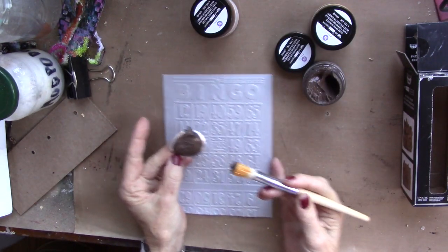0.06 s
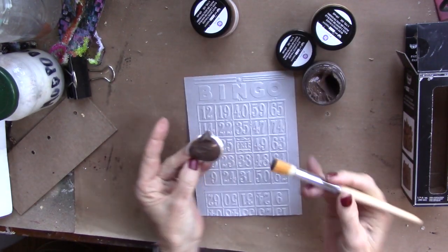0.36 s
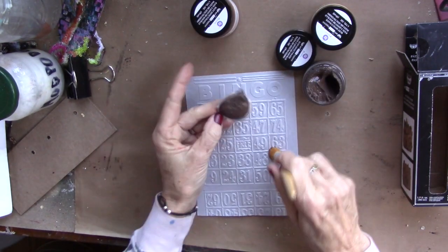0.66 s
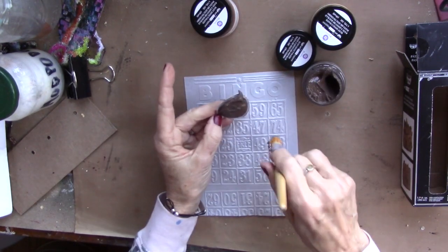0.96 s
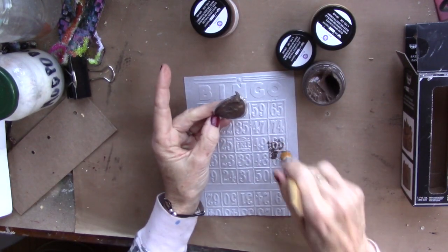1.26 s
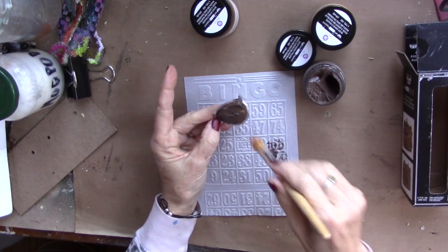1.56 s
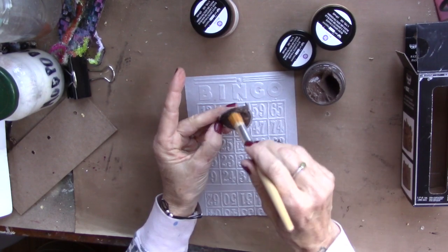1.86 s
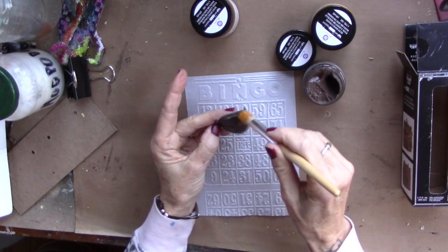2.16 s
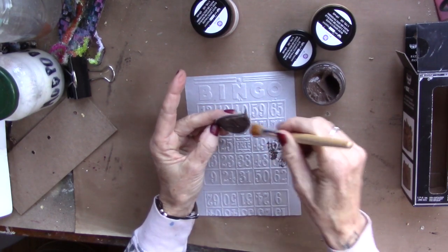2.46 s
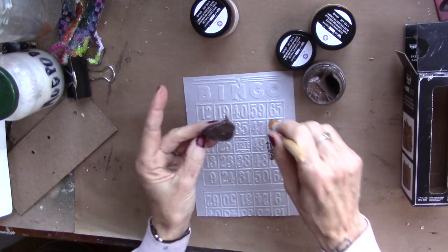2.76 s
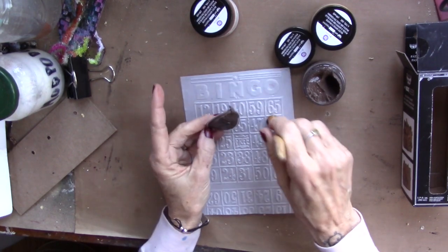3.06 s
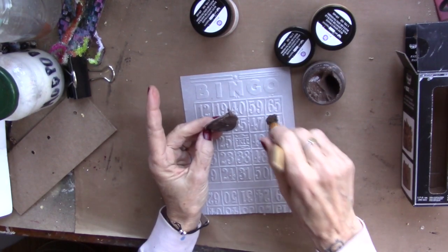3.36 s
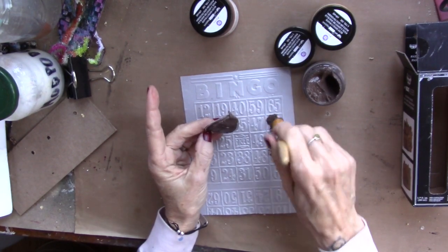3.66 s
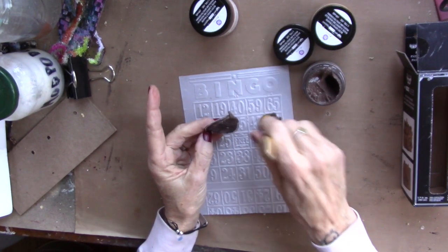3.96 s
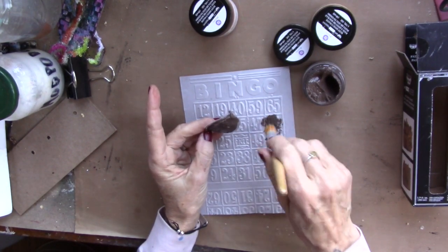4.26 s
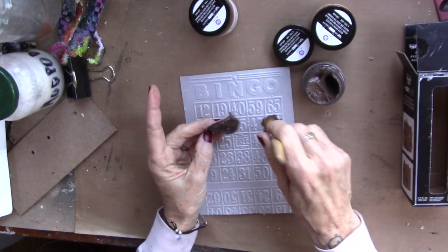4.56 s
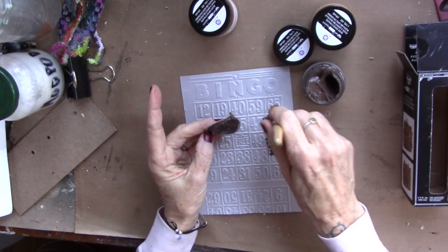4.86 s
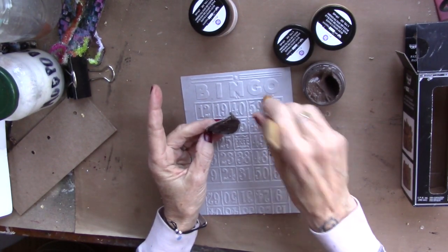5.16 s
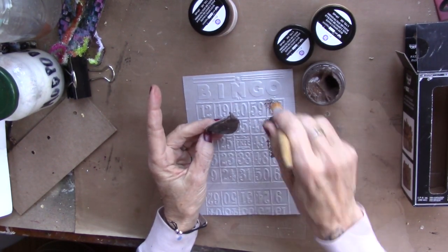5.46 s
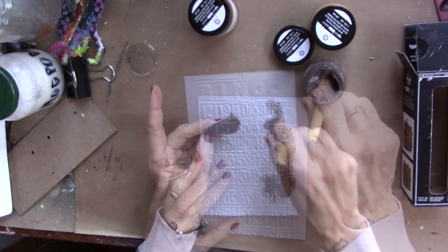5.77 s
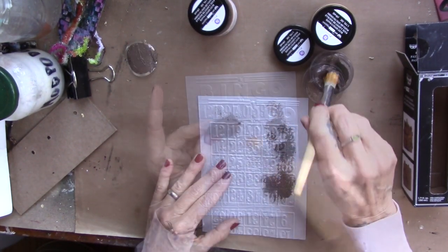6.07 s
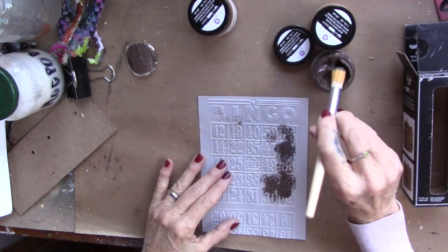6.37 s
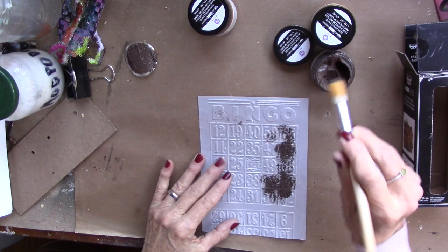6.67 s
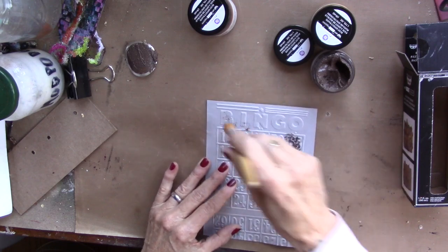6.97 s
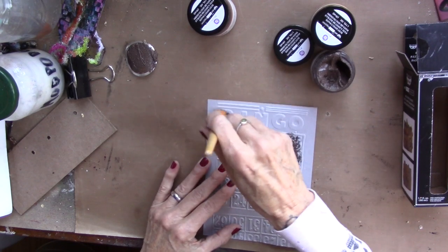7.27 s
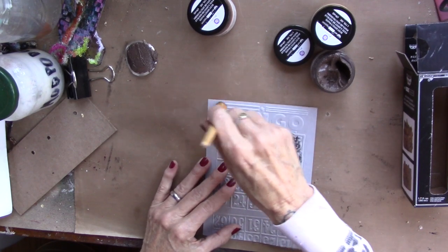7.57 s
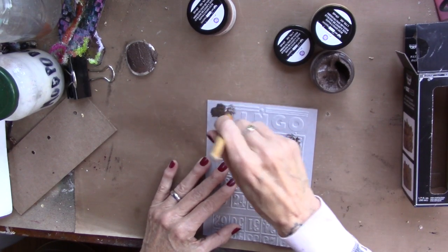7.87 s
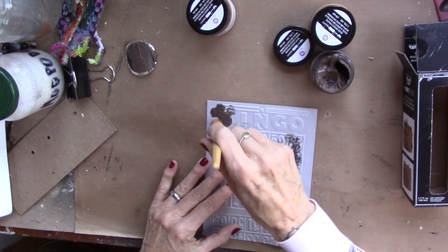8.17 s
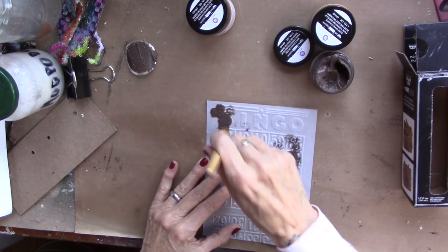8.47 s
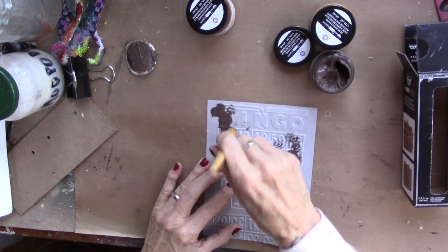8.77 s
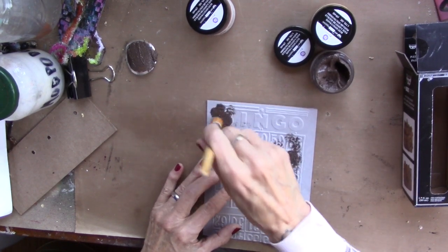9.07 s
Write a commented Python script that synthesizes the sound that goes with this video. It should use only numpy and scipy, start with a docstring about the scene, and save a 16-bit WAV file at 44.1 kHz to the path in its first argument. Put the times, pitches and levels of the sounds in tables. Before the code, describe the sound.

A small stiff brush dabs thick paste onto card lying on a table, about six taps a second. Each tap has a crisp bristle crunch, a dull knock and a faint sticky release. A short run comes first, then a long one, then a slightly softer one, with card and sleeve sliding faintly in the pauses. It sounds close, in a small room with a steady hum.

```python
"""A small stiff brush dabs thick paste onto card lying on a craft table, in three runs of quick taps. In each
dab the bristle tips touch, the brush bottoms out and knocks the table, the bristles crush, an air pocket pops
and the sticky paste lets go. Card, hand and sleeve slide now and then, and the brush rubs on the paste holder.
The room is small, with a steady hum and a faint whine; left and right sound almost the same."""
import sys
import numpy as np
from scipy import signal
from scipy.fft import rfft, irfft
from scipy.io import wavfile

SR = 44100
rng = np.random.default_rng(int(sys.argv[2]) if len(sys.argv) > 2 else 0)


def store_pcm(level_fs):
    """Save levels as 16-bit WAV."""
    pcm = np.round(np.clip(level_fs, -1, 1) * 32767).astype(np.int16)
    wavfile.write(sys.argv[1], SR, np.atleast_2d(pcm).T)


N = 406818
BLOCK = 8192  # samples; short sounds and filters are sized from this

# tone colours, as the relative strength of each pitch (f/Hz, level/dB)
HUM_COLOUR = [(25, -26), (60, -13.5), (110, -3), (160, -2), (230, 1.5), (350, 1.5), (500, -3), (800, -6.5),
              (2000, -12), (5000, -18.5), (11000, -25.5), (16000, -35)]  # room noise
RUB_COLOUR = [(100, -24), (800, -3), (1600, 6.5), (3000, 1), (6000, -2), (10000, -5.5), (13000, -13),
              (16000, -23)]  # sliding card and sleeve
FLICK_COLOUR = [(80, -28), (500, -20), (1500, 2.5), (3000, -1), (4200, -4.5), (6000, -1.5), (10000, -4),
                (13000, -14), (16000, -16)]  # a bristle springing loose
BRISTLE_COLOUR = [(80, -33.5), (400, 2.5), (900, -5.5), (1500, -0.5), (3000, -1.5), (4200, -9.5),
                  (5800, -7), (8000, -11.5), (11500, -17), (15500, -28.5)]  # many bristles together
SLAP_COLOUR = [(80, -28), (400, 3), (900, -2), (1500, 0), (3000, 0.5), (4200, -7), (5800, -2.5),
               (8000, -15), (11500, -20.5), (15500, -35)]  # card hitting the table
THUD_COLOUR = [(30, -36.5), (60, -29), (110, -2.5), (200, 2.5), (320, 10.5), (520, -2.5), (800, -0.5),
               (1200, -34.5), (2000, -37), (4000, -34), (10000, -52)]  # the push into the table
CHATTER_COLOUR = [(60, -38), (150, -4), (320, 2.5), (550, -4.5), (820, 2.5), (1150, -13), (2000, -11.5),
                  (5000, -22), (12000, -45)]  # buzzing card
PASTE_COLOUR = [(100, -33), (600, 5), (1600, 7.5), (3500, 2.5), (6000, 2), (10000, -3), (13000, -7),
                (16000, -14)]  # tearing paste
# left-right difference of the room noise, compared with what both sides share (f/Hz, level/dB)
HUM_WIDTH = [(30, -9), (70, -13), (200, -13), (700, -10), (2400, -10), (4400, -18), (8000, -35),
             (15000, -35)]
# change in the room noise, which dips briefly (t/s, level/dB)
HUM_DRIFT = [(0, -3.2), (5.8, -3.5), (6.019, -6), (6.4, -2.5), (9.2, -2)]
# loudness of the electrical whine (t/s, level/dB)
WHINE_LEVELS = [(0, -78), (2.1, -81), (3.3, -72), (6, -80), (7.3, -76), (9.2, -79)]
# slides of card, hand and sleeve, and near 2.4-2.7 s the brush rubbing on the paste holder (loudest t/s,
# rise/s, fall/s, level/dB, treble/dB)
SLIDES = [(.22, 0.46, 0.17, -50, 0.5), (2.419, 0.16, .08, -61, 18), (2.67, .12, .08, -59, 2),
          (2.9, 0.067, 0.12, -55.5, -7), (3.085, 0.017, 0.019, -48.5, 0), (3.891, 0.044, 0.076, -52.5, 3),
          (6.665, 0.029, 0.048, -59, 10), (6.83, 0.096, 0.12, -51, 0)]
# single flicks of bristle and card (t/s, level/dB, treble/dB)
FLICKS = [(0.2313, -33, 17), (.2513, -34, 6), (2.8704, -38, -52), (2.8778, -44, -49), (2.887, -40.5, 11),
          (2.9314, -42, -23), (2.9732, -42, -8), (3.0722, -47.5, 0), (3.924, -46, -2), (4.3518, -31.5, 3),
          (7.967, -55, 15)]
# brush dabs (knock t/s, time for the tips to flatten/s, time held down/s, thud level/dB, slap level/dB)
DABS = [(0.6411, 0.0079, 0.071, -41, -30), (0.8343, 0.0067, 0.062, -35, -24.5),
        (1.0216, 0.0029, 0.055, -34.5, -23.5), (1.201, 0.0034, 0.054, -33.5, -28),
        (1.366, 0.0042, .051, -33.5, -30), (2.8309, 0.012, 0.082, -46.5, -41.5),
        (3.151, .010, 0.089, -39.5, -78), (3.3255, 0.007, .064, -40.5, -36),
        (3.4865, 0.0067, 0.057, -41.5, -35.5), (3.6538, 0.0087, 0.057, -37.5, -29),
        (3.821, 0.013, 0.076, -37, -25), (3.9705, 0.013, 0.068, -39.5, -35),
        (4.1477, 0.0099, 0.049, -41.5, -31), (4.3191, .0075, 0.076, -36, -26),
        (4.5068, 0.0088, .073, -38, -30), (4.6764, 0.011, 0.078, -37.5, -28),
        (4.8444, 0.012, 0.068, -42.5, -35), (5.0193, .014, .058, -42.5, -35.5),
        (5.19, .012, 0.064, -41.5, -35.5), (5.376, 0.0088, 0.062, -37.5, -27.5),
        (5.5474, 0.0038, 0.06, -35, -36.5), (5.7238, 0.0058, 0.058, -34, -28.5),
        (7.0785, .016, 0.091, -47.5, -36), (7.239, .015, .074, -43, -37), (7.4017, 0.017, 0.079, -39, -32),
        (7.559, 0.021, .067, -42, -38), (7.725, 0.016, 0.058, -45.5, -38.5),
        (7.8966, .015, 0.074, -43, -33.5), (8.0616, .016, 0.071, -43.5, -36.5),
        (8.2358, 0.011, 0.063, -54, -50), (8.4139, 0.0076, 0.054, -46, -37),
        (8.5956, 0.0058, 0.065, -38, -33.5), (8.771, 0.0069, 0.044, -39, -33.5),
        (8.943, 0.0071, 0.051, -40.5, -32), (9.1119, 0.0082, 0.065, -42, -35)]
# each run has its own load of paste and spot on the card; in the last a hand holds the card down
# (start t/s, crush level/dB, lift level/dB, pop level/dB, card's ring f/Hz, chatter over thud/dB)
RUNS = [(.5, -44, -46, -49, 1370, -1.5), (2.7, -45.5, -53, -64, 1350, -4), (6.9, -42, -48, -41, 1624, -5)]
# the tones at which the table top rings (f/Hz, relative level/dB, time to fade by 60 dB/s)
TABLE_TONES = [(57, -18, .3), (75, -18, .3), (110, -8, .27), (167, -15, .24), (196, -7, .23),
               (221, -3, .24), (275, -1, .23), (303, -2, .22), (322, 1, .24), (363, -4, .22),
               (428, -4, .22), (479, -6, .21), (560, -9, .2), (592, -6, .21), (703, -7, .2), (790, -4, .19),
               (824, -1, .2), (899, -7, .19), (969, -11, .18), (1066, -12, .18), (1244, -9, .18)]
# wait from the knock to the pop of air (earliest t/s, latest t/s)
POP_DELAY = (0.0058, 0.015)
# soft bumps of brush and hand that shake the card (t/s, level/dB)
BUMPS = [(1.775, -54.5), (2.875, -46), (2.985, -45.5)]
# how long the room's echo lasts (f/Hz, time to fade by 60 dB/s)
ROOM_DECAY = [(100, 0.91), (260, 0.32), (700, 0.42), (1840, 0.44), (4850, 0.32), (12000, 0.085)]

SNAP_S, THUD_S = .0035, .03  # the level of a snap or a thud is its average over this time


def gain_of(db):
    """Turns decibels into a number to multiply by."""
    return 10 ** (np.asarray(db) / 20)


def unit(x):
    """Scales a sound to an energy of one."""
    return x / np.sqrt(np.sum(x ** 2) + 1e-20)


def value_at(points, hz):
    """Looks up pitches in a table, joining its points by straight lines over log frequency."""
    f, value = np.transpose(points)
    return np.interp(np.log(hz + 1), np.log(f), value)


def add(mix, s, sound):
    """Mixes a sound in at s seconds."""
    start = round(s * SR)
    sound = sound[max(-start, 0):]
    part = mix[max(start, 0):][:len(sound)]
    part += sound[:len(part)]


def click(colour, treble_db=0, card_hz=1500, card_db=0, card_width_hz=240):
    """One click of a given colour, with more or less treble and a peak where the card rings."""
    hz = np.fft.rfftfreq(BLOCK, 1 / SR)
    db = value_at(colour, hz) + treble_db * hz ** 2 / (hz ** 2 + 4000 ** 2)
    db += card_db / (1 + ((hz - card_hz) / card_width_hz) ** 2)
    # keep the colour but pack the energy at the start of the click
    cepstrum = irfft(np.log(gain_of(db)))
    cepstrum[1:BLOCK // 2] *= 2
    cepstrum[BLOCK // 2 + 1:] = 0
    return unit(irfft(np.exp(rfft(cepstrum)))[:BLOCK // 2])


def crackle(envelope, grain, per_s, spread_db):
    """Many uneven copies of the click `grain` over a faint hiss; the envelope shapes their loudness."""
    count = len(envelope)
    size = gain_of(spread_db * np.minimum(rng.exponential(1, count), 4))
    sign = rng.choice([-1, 1], count)
    hits = rng.random(count) < per_s / SR
    kicks = size * sign * (hits + 0.06)
    return unit(signal.fftconvolve(kicks * envelope, grain)) * np.linalg.norm(envelope)


def hum(base_db=-55.5):
    """Steady room noise and microphone hiss, almost the same left and right."""
    hz = np.fft.rfftfreq(N, 1 / SR)
    middle, side = rfft(rng.standard_normal((2, N))) * gain_of(value_at(HUM_COLOUR, hz))
    side *= gain_of(value_at(HUM_WIDTH, hz))
    pair = np.sqrt(2 * N) * unit(irfft(np.array([middle + side, middle - side]), N))
    drift_db = np.interp(np.arange(N) / SR, *np.transpose(HUM_DRIFT))
    return gain_of(base_db + drift_db) * pair


def whine(centre_hz=5530, width_hz=45):
    """A faint, wavering electrical tone: a narrow band of the microphone's own noise."""
    hz = np.fft.rfftfreq(N, 1 / SR)
    tone = irfft(rfft(rng.standard_normal(N)) / (1 + ((hz - centre_hz) / width_hz) ** 2), N)
    db = np.interp(np.arange(N) / SR, *np.transpose(WHINE_LEVELS))
    return gain_of(db) * np.sqrt(N) * unit(tone)


def slides():
    """Card, hand, sleeve and the brush on the paste holder rub with a fine grain that swells and dies away."""
    out = np.zeros(N)
    for s, rise, fall, db, treble_db in SLIDES:
        envelope = np.interp(np.arange(-rise, fall, 1 / SR), [-rise, 0, fall], [0, 1, 0])
        rub = crackle(envelope, click(RUB_COLOUR, treble_db), per_s=12000, spread_db=4.5)
        add(out, s - rise, gain_of(db) * rub)
    return out


def snap(db, grain, fade_s):
    """A tiny, sharp hit: a very short, dense burst of clicks."""
    t = np.arange(BLOCK // 32) / SR
    envelope = unit(t * np.exp(-t / (fade_s / 2)))
    return gain_of(db) * np.sqrt(SNAP_S * SR) * crackle(envelope, grain, per_s=9000, spread_db=2.9)


def flicks():
    """Single bristles or the card's edge spring loose."""
    out = np.zeros(N)
    for s, db, treble_db in FLICKS:
        add(out, s + 0.000975, snap(db, click(FLICK_COLOUR, treble_db), fade_s=0.00082))
    return out


def touch(s, db, flatten_s, grain, softness=0.13, graze_db=-17):
    """The longest bristles graze, then the tips land and skid until s. Gives start time and sound."""
    t = np.arange(-int(2 * flatten_s * SR), 0) / SR
    landing = .5 + .5 * np.tanh((t / flatten_s + 1) / softness)
    graze = gain_of(graze_db) * np.hanning(len(t))
    return s + t[0], gain_of(db) * crackle(landing + graze, grain, per_s=6000, spread_db=0.9)


def thud(db, ring_db=-2, push_db=-4, travel_s=0.004966, edge_db=-5):
    """A dull push spreads through the table top and leaves it ringing."""
    t = np.arange(2 * BLOCK) / SR
    hz, tone_db, decay_s = np.transpose(TABLE_TONES)[:, :, None]
    spot_db, phase = rng.standard_normal((2, len(TABLE_TONES), 1))  # each spot rings a bit differently
    tones = gain_of(tone_db + spot_db - 60 * t / decay_s) * np.sin(2 * np.pi * (hz * t + phase))
    sound = gain_of(ring_db) * unit(tones.sum(0) * (1 - np.exp(-t / 0.0013)))
    # high pitches cross a bending board faster; this delays 300 Hz by travel_s
    push_hz = np.fft.rfftfreq(BLOCK // 2, 1 / SR)
    delay = np.exp(-4j * np.pi * travel_s * np.sqrt(300 * push_hz))
    push = gain_of(push_db) * irfft(rfft(click(THUD_COLOUR)) * delay)
    add(sound, -travel_s / 4, push)
    add(sound, rng.uniform(0.0029, 0.01076), gain_of(edge_db) * push)  # bounces off the table's edge
    return gain_of(db) * np.sqrt(THUD_S * SR) * sound


def chatter(db, rise_s=0.0011, fade_s=0.024):
    """The card buzzes against the shaking table and settles."""
    t = np.arange(BLOCK) / SR
    envelope = unit((1 - np.exp(-t / rise_s)) * np.exp(-t / fade_s))
    buzz = crackle(envelope, click(CHATTER_COLOUR), per_s=4000, spread_db=3.2)
    return gain_of(db) * np.sqrt(THUD_S * SR) * buzz


def crush(db, grain, fade_s=0.0084, creep_db=-21):
    """Bristles buckle in the paste, then creep quietly."""
    t = np.arange(BLOCK // 2) / SR
    buckle = np.e * t / fade_s * np.exp(-t / fade_s)
    creep = gain_of(creep_db) * np.hanning(len(t))
    return gain_of(db) * crackle(buckle + creep, grain, per_s=1400, spread_db=4.7)


def pop(db, hz, ring_s=.002, ring_db=-1):
    """A pocket of air bursts in the squeezed paste: a dull tick and a short, wet ring."""
    t = np.arange(BLOCK // 8) / SR
    ring = unit(np.sin(2 * np.pi * hz * t) * np.exp(-t / ring_s))
    sound = snap(db, click(FLICK_COLOUR, treble_db=-30), fade_s=0.00068)
    add(sound, 0, gain_of(db + ring_db) * np.sqrt(SNAP_S * SR) * ring)
    return sound


def lift(s, db, rise_s=0.018, fall_s=0.0077):
    """Threads of paste tear ever louder until the brush comes free at s. Gives start time and sound."""
    t = np.arange(-BLOCK // 4, BLOCK // 8) / SR
    envelope = np.exp(np.minimum(t / rise_s, -t / fall_s))
    tearing = crackle(envelope, click(PASTE_COLOUR, treble_db=.4), per_s=2500, spread_db=2.3)
    return s + t[0], gain_of(db) * tearing


def dabs(usual_thud_db=-40.5, usual_touch_db=-40.5, usual_flatten_s=.01):
    """The brush lands, knocks the table and pulls away. Gives the crisp sounds and the dull ones."""
    crisp, dull = np.zeros((2, N))
    chance = rng.uniform(-1.1, 1, (len(DABS), 4))
    for (s, flatten_s, held_s, thud_db, slap_db), (spot, when, size, pitch) in zip(DABS, chance):
        _, crush_db, lift_db, pop_db, card_hz, chatter_db = [run for run in RUNS if run[0] < s][-1]
        card_hz *= 1 + 0.1 * spot
        force_db = thud_db - usual_thud_db
        speed_db = 20 * np.log10(usual_flatten_s / flatten_s)
        touch_db = usual_touch_db + 0.33 * force_db + .85 * speed_db  # harder or faster is louder
        treble_db = 0.19 * (slap_db - thud_db - 7)  # a slap that stands out over the thud is brighter
        tip_click = click(BRISTLE_COLOUR, treble_db, card_hz, card_db=9.5)
        slap_click = click(SLAP_COLOUR, treble_db, card_hz, card_db=6.4)
        crush_click = click(BRISTLE_COLOUR, treble_db - 2, card_hz, card_db=5)
        add(crisp, s - flatten_s, snap(touch_db - 1, tip_click, fade_s=0.002))  # the tips land
        add(crisp, *touch(s, touch_db, flatten_s, tip_click))
        add(crisp, s, snap(slap_db, slap_click, fade_s=0.0014))  # the card slaps the table
        add(crisp, s + 0.000975, crush(crush_db + 0.32 * force_db, crush_click))
        pop_s = s + np.interp(when, [-1, 1], POP_DELAY)
        add(crisp, pop_s, pop(pop_db + 3 * size, hz=1690 * (1 + 0.11 * pitch)))
        add(crisp, *lift(s + held_s, lift_db))
        add(dull, s, thud(thud_db))
        add(dull, s, chatter(thud_db + chatter_db))
    for s, db in BUMPS:
        add(dull, s, chatter(db, rise_s=0.0013))
    return crisp, dull


def room(early_db, tail_db, early_fade_s=0.0036, early_side_db=-27, tail_side_db=-13):
    """The room's stereo answer to a click: direct sound, close echoes, then a tail that grows duller."""
    t = np.arange(2 * BLOCK) / SR
    echoes = rng.choice([-1., 1.], (4, len(t))) * (rng.random((4, len(t))) < 4000 / SR)
    early = echoes[:2] * np.exp(-t / early_fade_s) * (t > .001)
    hz, when, spectrum = signal.stft(echoes[2:] * (t > .005), SR, nperseg=256)
    fade = gain_of(-60 * when / value_at(ROOM_DECAY, hz)[:, None])
    tail = signal.istft(spectrum * fade, SR, nperseg=256)[1][:, :len(t)]
    middle = (t == 0) + gain_of(early_db) * unit(early[0]) + gain_of(tail_db) * unit(tail[0])
    side = gain_of(early_side_db) * unit(early[1]) + gain_of(tail_db + tail_side_db) * unit(tail[1])
    return np.array([middle + side, middle - side])


def scene():
    """Brush and table in the room; four sets of echoes blend in turn so the room's colour stays even."""
    crisp, dull = dabs()
    crisp = crisp + flicks() + slides()
    out = hum() + whine()
    for k in range(4):  # one full round each second
        share = np.maximum(np.cos(2 * np.pi * np.arange(N) / SR + k * np.pi / 2), 0) ** 2
        out += signal.oaconvolve([crisp * share], room(early_db=-8.5, tail_db=-18.0), axes=1)[:, :N]
        out += signal.oaconvolve([dull * share], room(early_db=-29, tail_db=-15.5), axes=1)[:, :N]
    return out


def record(dry):
    """Cuts away the treble above 16 kHz."""
    low_pass = signal.firwin(511, 16000, window=("kaiser", 9), fs=SR)
    return signal.oaconvolve(dry, low_pass[None], "same")


dry = scene()
out = record(dry)
store_pcm(out)
```